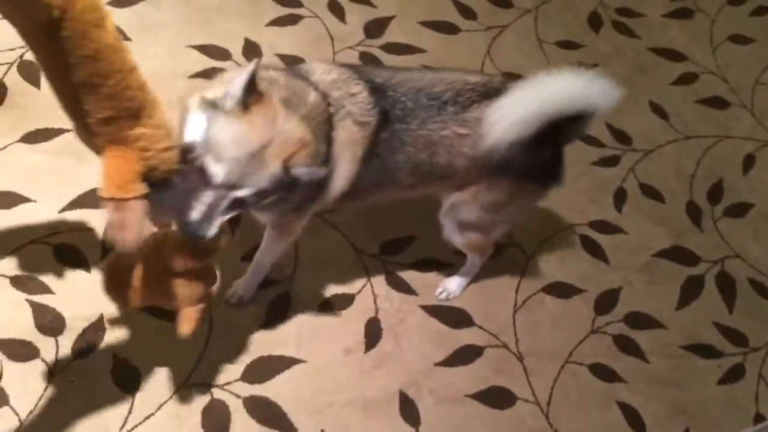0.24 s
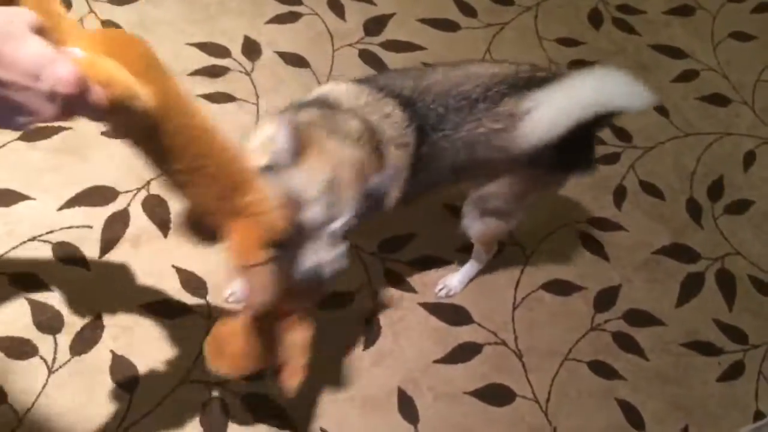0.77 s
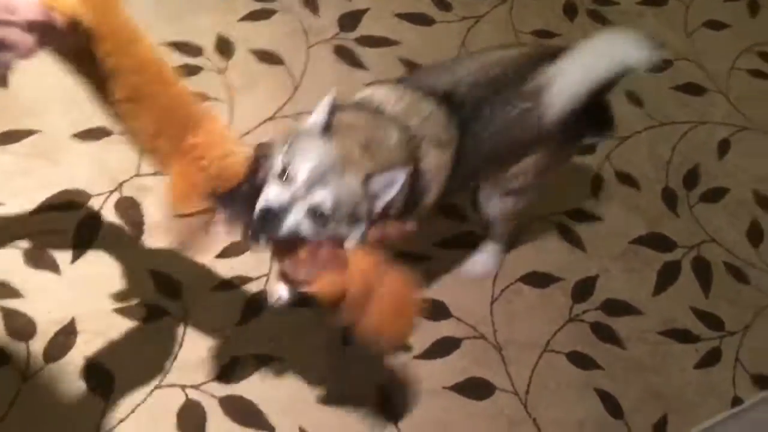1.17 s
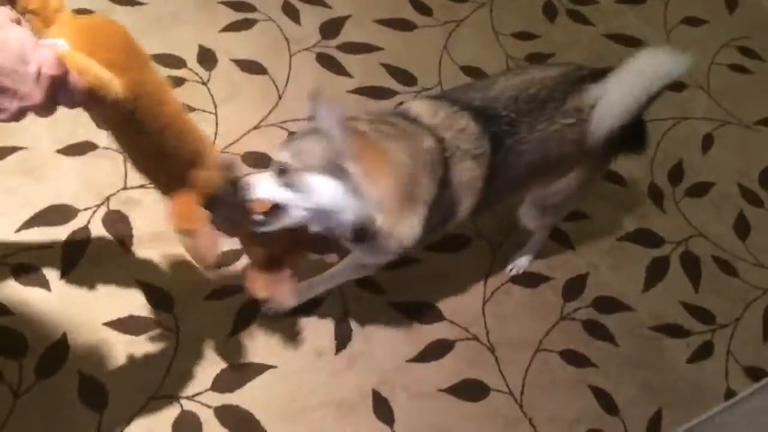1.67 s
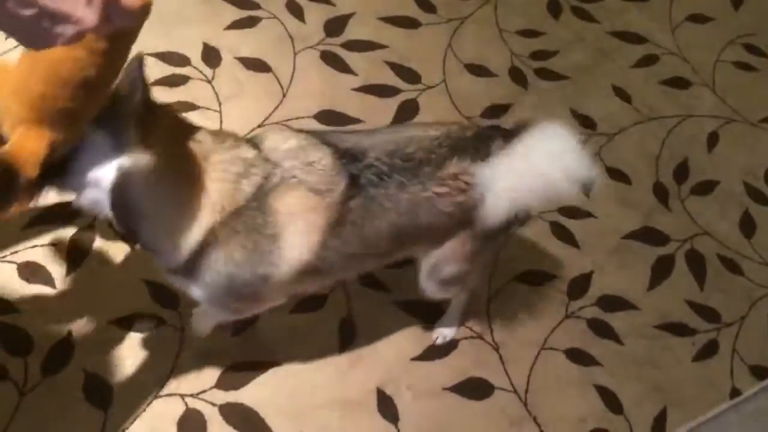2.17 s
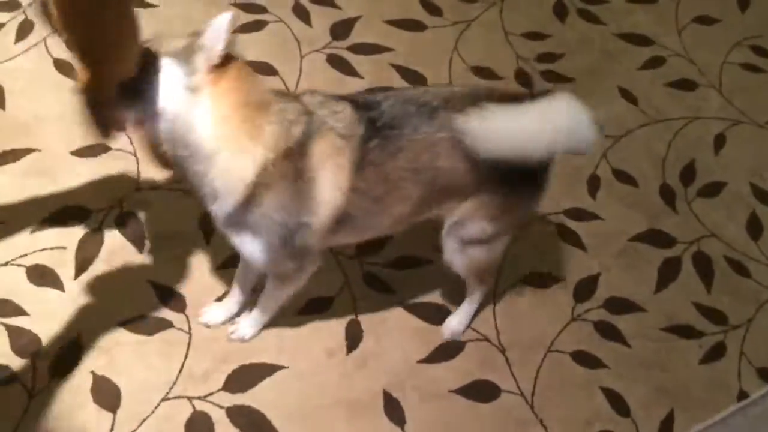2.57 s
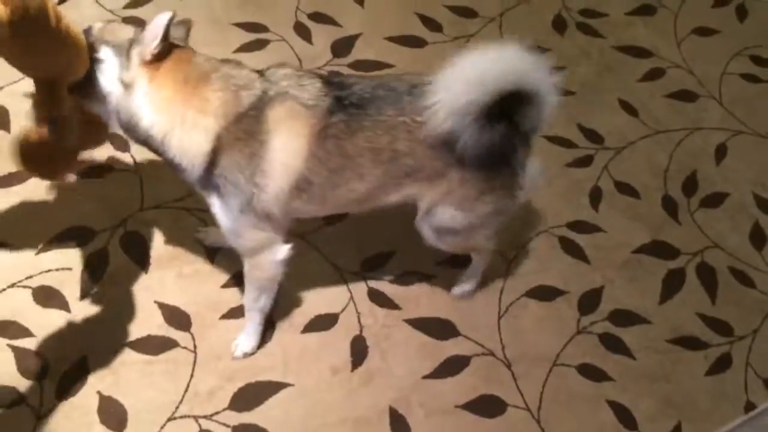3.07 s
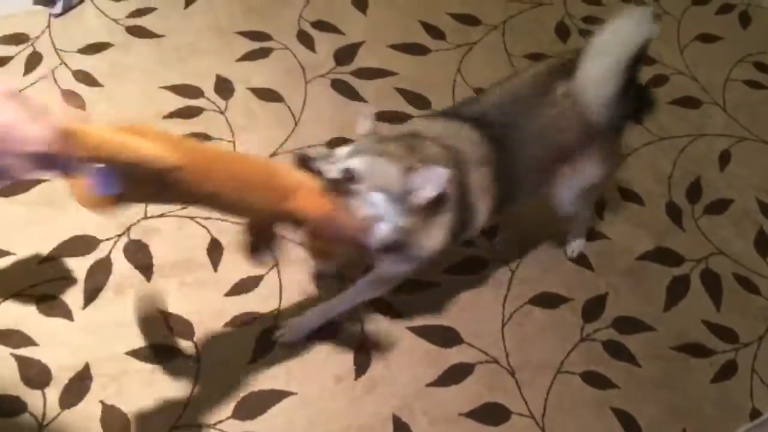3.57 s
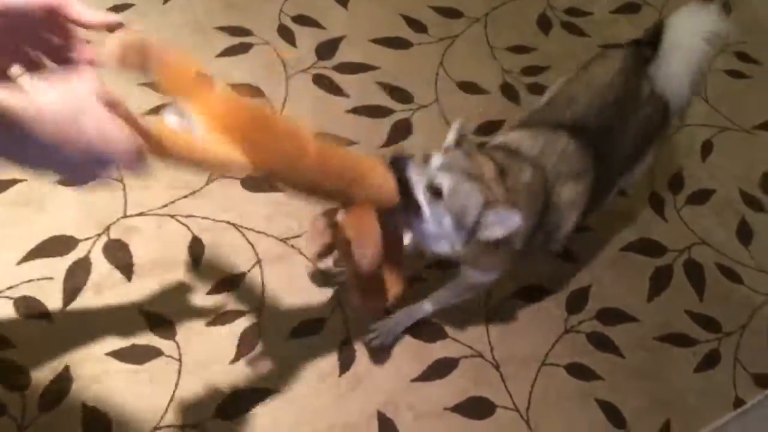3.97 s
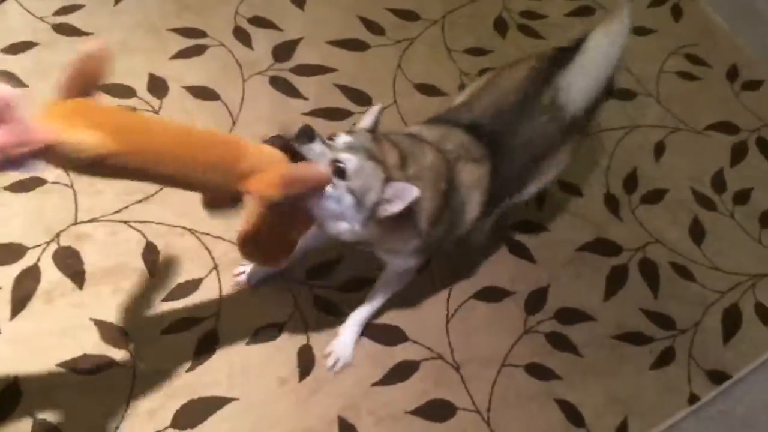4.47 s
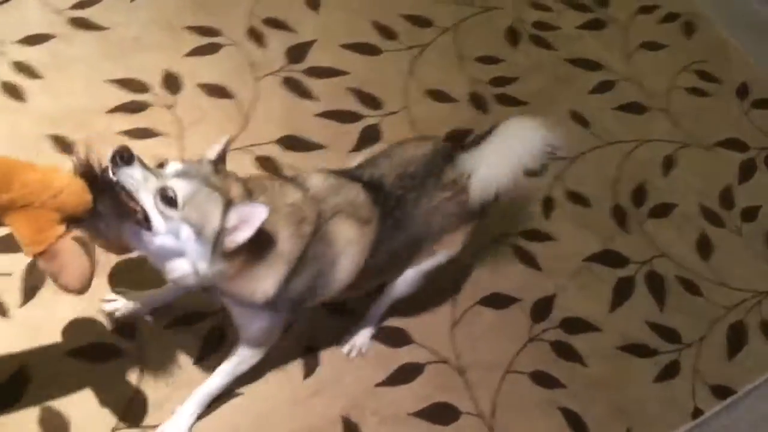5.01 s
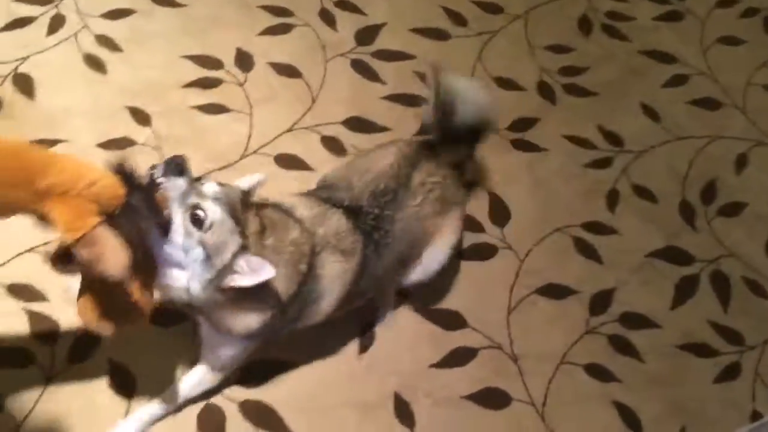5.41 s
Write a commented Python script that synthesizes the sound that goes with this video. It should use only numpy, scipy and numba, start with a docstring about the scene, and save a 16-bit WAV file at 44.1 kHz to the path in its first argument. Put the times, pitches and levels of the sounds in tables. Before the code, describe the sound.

A dog tugs a soft toy indoors, heard close by with short room reflections. Quiet rubbing and clicks come first, then a single abrupt nasal squeak with a thin rasping reply. Paws thump dully on carpet in two clusters, around two and three and a half seconds. Finally the dog growls, throaty and broken, strongest just after five seconds, over soft air and hum.

```python
"""A dog tugs at a plush toy on a carpet in a small room, over a faint mains hum and soft air noise.
At first filtered noise rustles as plush and short ticks click as teeth; then a bite makes the reed honk,
a pulse train through a sinking resonance, and the air flowing back makes it rasp with a thin whistle.
Paws thud as dying noise bursts; at last the dog growls: uneven pulses ring a throat in short grunts
that swell into an open-mouthed snarl, with rough notes and single hard flaps on top."""
import sys
import numpy as np
from scipy import signal
from scipy.fft import rfft, irfft, next_fast_len
from scipy.io import wavfile
from scipy.ndimage import uniform_filter1d
from numba import njit

SR = 44100
rng = np.random.default_rng(int(sys.argv[2]) if len(sys.argv) > 2 else 0)


def dump_mix(stems):
    """Bounce the given channels to the path in sys.argv[1] as a 16-bit WAV at rate SR."""
    frames = np.atleast_2d(stems).T  # one column per channel
    limited = np.clip(frames, -1, 1)  # hard clip at full scale
    pcm = np.round(limited * 32767).astype(np.int16)
    wavfile.write(sys.argv[1], SR, pcm)


N = 249165
TIME = np.arange(N) / SR

# The bite squeezes the air out: its pressure raises the reed's loudness and pitch together.
BITE_START_S, BITE_RISE_S, BITE_FALL_S = 1.1125, 0.020, 0.041
BITE_DB = -23.5
REED_SLACK_HZ, REED_PRESSED_HZ = 352, 484
REED_DELAY_S, REED_ONSET_S = 0.0018, 0.00092  # the reed sticks briefly, then speaks at once
# The chamber's resonance sinks as it is bitten.
CHAMBER_START_HZ, CHAMBER_END_HZ, CHAMBER_SINK_S, CHAMBER_WIDTH_HZ = 4870, 1930, 0.02, 600
# Short pipe that holds the reed and rings on both strokes. Each row: centre in Hz, width in Hz, level in dB.
PIPE_MODES = [(1430, 130, -1), (2255, 62, -2), (3020, 130, -3), (5850, 170, 1)]
# Hard surfaces close to the toy. Each row: delay in seconds, level in dB.
NEAR_ECHOES = [(.0007, -28.5), (.0021, -25), (.0063, -12)]
# Curve of the reed as air flows back. Each row: time in seconds, pitch in Hz, level in dB.
REFILL_CURVE = [(1.242, 730, -33), (1.246, 770, -29.5), (1.250, 900, -26), (1.2535, 1030, -21),
                (1.257, 1180, -26), (1.261, 700, -33), (1.269, 640, -28.5), (1.275, 620, -34),
                (1.283, 590, -43)]
# Returning air whistling in the pipe. One row: start, swell and fade in seconds, level in dB, pitch in Hz.
WHISTLE = (1.21, 0.0072, 0.0449, -41.5, 5750)
# Tone colour of the toy on each stroke. Each row: frequency in Hz, level in dB.
SQUEEZE_COLOUR = [(200, -4), (430, -3), (950, -9), (1450, -7.5), (1900, -8.5), (2700, -8.5), (3600, -6.5),
                  (5000, -13.5), (7000, -20.5), (10000, -37), (15000, -47.5)]
REFILL_COLOUR = [(350, -15.5), (520, -17), (680, -3), (1000, -9), (1450, 0), (2000, -1), (2900, -16),
                 (4500, -29), (5600, -17), (6400, -22), (10000, -28.5), (15000, -48.5)]

# Grunts of the growl. Each row: start, swell and fade in seconds, peak in dB before the dog's mix.
GRUNTS = [(4.021, 0.056, 0.02505, -42), (4.135, 0.004, 0.0427, -54), (4.298, 0.017, 0.0407, -43),
          (4.352, 0.041, .026, -37), (4.535, 0.045, 0.0337, -47), (4.6, 0.041, 0.026, -44),
          (4.644, 0.033, .06, -39.5), (4.748, 0.0084, 0.02224, -44.5), (4.803, 0.012, 0.0606, -45),
          (4.85, 0.035, 0.0612, -42.5), (4.948, 0.011, 0.1254, -33.5), (4.971, .115, 0.1386, -32.5),
          (5.121, 0.097, 0.101, -30.5), (5.26, .018, .055, -30.5), (5.335, 0.064, 0.0259, -45),
          (5.434, 0.04, 0.0853, -46), (5.527, 0.015, 0.1206, -48)]
# Each grunt starts and ends this far under its peak; its edges take this long.
GRUNT_SWELL_DB, GRUNT_EDGE_S = 9, 0.01203
# The folds flap faster with effort: pulses per second at the reference level, and the dB that double it.
FLAP_HZ, FLAP_REFERENCE_DB, FLAP_DOUBLING_DB = 110.93, -34, 55
# Pitch of the voice inside the growl, moving with each pull. Each row: time in seconds, pitch in Hz.
PITCH_CURVE = [(4.0, 274.5), (4.035, 337.2), (4.065, 348.6), (4.1, 420.1), (4.265, 310.6), (4.29, 412.2),
               (4.325, 464.3), (4.35, 343.9), (4.375, 314.3), (4.4, 379.4), (4.44, 428.7), (4.53, 295.7),
               (4.68, 289.4), (4.83, 370), (4.9, 304.2), (4.93, 324), (4.98, 332.8), (5.04, 425.7),
               (5.075, 462.2), (5.1, 437.8), (5.125, 373), (5.162, 430), (5.185, 327.4), (5.24, 329.2),
               (5.277, 436.4), (5.3, 324.7), (5.41, 320.6), (5.46, 398.5), (5.6, 340.6)]
# Fixed throat resonances. Each row: centre in Hz, width in Hz, level in dB.
THROAT_MODES = [(131, 32, -15.5), (216.3, 40, -5.5), (318, 40, -3), (450, 60, -3)]
VOICE_RING_WIDTH_HZ, VOICE_RING_DB = 160, 1  # the throat rings most near the voice's pitch
# Tone colour of the mouth, and of the bared teeth. Each row: frequency in Hz, level in dB.
MOUTH_COLOUR = [(350, -20.5), (570, -12.5), (710, 3.5), (850, 2.5), (1030, 4.5), (1250, -13), (1700, -31)]
SNARL_COLOUR = [(850, -8), (1280, 7.5), (1600, 2.5), (2200, -5.5), (2700, -12.5), (3300, -17.5),
                (4200, -28.5), (6500, -36.5), (10000, -62)]
# Jaw opening, heard as mouth against chest. Each row: time in seconds, level in dB before a fixed trim.
JAW_CURVE = [(4.05, -19), (4.27, -3), (4.3, -10), (4.34, -11.5), (4.4, -10.5), (4.48, 0), (4.57, -9),
             (4.78, -19), (4.82, -13.5), (4.87, -9), (4.935, -8), (4.957, -7), (5.12, -5), (5.17, -5),
             (5.28, -9), (5.4, -10.5), (5.5, 0.5), (5.6, -14.5)]
# Lips drawing off the teeth, as snarl against mouth. Each row: time in seconds, level in dB before a trim.
TEETH_CURVE = [(4.1, -2.5), (4.32, -3.5), (4.4, -0.5), (4.67, -2), (4.97, -4.5), (5.1, 0.5), (5.2, -2.5),
               (5.28, -0.5), (5.36, -6), (5.5, -1)]
# The snarl above 2.3 kHz: lift in dB where the teeth curve is at 0 dB, and dB per dB of baring.
TOP_DB, TOP_FOLLOWS = 6.5, 0.97
RASP_FLUTTER = 0.42  # share of the rasp that pulses with the throat
FLUTTER_HZ = 62.34  # the loose throat chops the voice about this often
# Moments when the voice rises out of the rattle.
# Each row: start, swell and fade in seconds, peak in dB before flutter and mix, flutter depth (held to 0.4-1).
NOTES = [(3.994, 0.048, 0.082, -43.5, .45), (4.05, 0.014, 0.018, -36, .7),
         (4.266, 0.012, 0.029, -41.5, 0.49), (4.3, 0.025, 0.048, -39.5, 0.57),
         (4.355, 0.041, 0.023, -35.5, .8), (4.413, 0.022, 0.01, -47.5, 0.39), (4.625, 0.04, 0.041, -39, .7),
         (4.896, 0.035, 0.025, -33.5, 0.77), (4.945, 0.025, 0.03, -35.5, 0.8),
         (5.035, 0.039, 0.096, -35, 0.74), (5.121, 0.0095, 0.025, -39, 0.38),
         (5.148, 0.013, 0.022, -28.5, 0.75), (5.17, 0.045, 0.038, -31, 0.69),
         (5.254, 0.02, 0.046, -35.5, 0.9), (5.34, 0.05, 0.037, -48, 0.57)]
# Second and third harmonic of the voice. Each entry: level in dB against the fundamental.
OVERTONES_DB = [-18, -31.5]
# Single flaps of the throat. Each row: start in seconds, peak in dB, brightness (lowpass) in Hz.
POPS = [(4.134, -33, 1186), (4.298, -38, 1400), (4.569, -38.5, 2000), (4.58, -36, 1300), (4.603, -39, 2600),
        (4.669, -32.5, 1698), (4.713, -37, 1000), (4.8137, -37, 1090), (4.822, -40, 1300),
        (4.953, -27.5, 1200), (5.024, -33, 2401), (5.05, -23, 1100), (5.07, -23, 1701)]
# What a single flap rings. Each row: centre in Hz before a random detune, width in Hz, level in dB.
POP_MODES = [(332, 97, 3), (464, 190, -2), (769, 94, -4), (1080, 199, -13.5), (1478, 280, -10.5),
             (2200, 400, -26)]

# Paws on the carpet. Each row: start in seconds, peak in dB, hardness (top of the band) in Hz, ring in seconds.
PAWS = [(1.481, -48.5, 960, 0.11), (1.967, -32, 390, 0.065), (1.982, -36, 335, 0.03),
        (2.105, -46, 1200, 0.17), (2.63, -48, 237, 0.026), (3.443, -41, 1190, 0.08),
        (3.457, -40, 597, 0.072), (3.532, -46.5, 447, 0.39), (3.581, -51, 805, 0.25),
        (3.657, -38.5, 427, 0.061), (3.776, -49.5, 700, 0.14), (4.135, -58, 710, 0.063),
        (4.525, -39.5, 201, 0.096)]
# Floor under a paw. Each row: frequency in Hz, level in dB.
FLOOR_COLOUR = [(40, -23), (90, -3.5), (140, -4), (220, 0), (340, 2), (460, -0.5), (650, -7), (1000, -7.5),
                (3000, -9)]
# Floor boom of heavy landings. Each row: start in seconds, pitch in Hz, level in dB before swell, ring in seconds.
BOOMS = [(1.968, 120.8, -40, 0.1), (4.336, 130.4, -41, 0.12), (4.522, 132, -31, 0.11)]
# Teeth and claws. Each row: start in seconds, peak in dB, centre in Hz, width in Hz.
CLICKS = [(.109, -55.5, 11000, 2800), (.482, -50.5, 7240, 2500), (.837, -59, 7000, 2000),
          (.887, -49, 1040, 1198), (1.044, -52.5, 7600, 1990), (1.484, -54, 6850, 1500),
          (1.784, -53.5, 5420, 3500), (2.022, -51, 1690, 700), (2.0352, -41.5, 1520, 1000),
          (2.052, -59, 1510, 400), (2.3193, -47.5, 6160, 3000), (2.792, -51, 2700, 1800),
          (2.793, -44.5, 7100, 4000), (3.962, -45, 1400, 2940), (4.229, -39.5, 7240, 1000),
          (4.242, -43.5, 1794, 4000), (4.539, -41.5, 1415, 500), (5.16, -42, 2347, 1500),
          (5.226, -39, 1974, 1500), (5.276, -38, 1900, 1500), (5.486, -34.5, 2230, 1500),
          (5.5463, -48, 2750, 1500)]
CLICK_BODY_DB = -5.5  # the duller body under each tick
CLICK_RING_S, CLICK_SHORTENING = 0.024, 0.23  # ring at 1 kHz; power by which brighter ticks are shorter

# Tugs that rub the plush. Each row: strongest moment, swell and fade in seconds, peak in dB before a 3 dB lift.
TUGS = [(.07, .1, 0.049, -69.5), (.38, 0.27, 0.34, -71), (.53, 0.06, 0.12, -67), (.74, 0.21, 0.081, -77.5),
        (1.03, 0.25, 0.12, -71), (1.452, 0.44, 0.19, -73), (1.98, 0.014, 0.13, -73.5),
        (2.12, 0.028, 0.038, -69), (2.51, 0.039, 0.042, -75.5), (2.75, 0.083, 0.026, -75),
        (2.81, 0.022, 0.11, -74), (3.47, 0.078, 0.22, -66), (3.56, 0.082, 0.17, -70.5),
        (3.79, 0.11, 0.09, -67), (3.97, 0.089, 0.034, -67.5), (4.08, 0.14, 0.12, -67.5),
        (4.26, 0.089, 0.13, -66), (4.38, 0.06, 0.085, -63.5), (4.65, 0.43, 0.18, -67.5),
        (4.96, 0.18, 0.18, -62.5), (5.2, 0.36, 0.085, -67.5), (5.49, 0.29, 0.12, -67.5),
        (5.629, 0.048, 0.025, -65)]
PLUSH_REST_DB = -82.5  # before the same lift: the toy never lies quite still in the teeth
PLUSH_CLUMP_DB = 1.46  # the pile catches and lets go in tufts
# Tone colour of the fibres. Each row: frequency in Hz, level in dB.
PLUSH_COLOUR = [(600, 1.5), (1500, 4), (4000, 0.5), (7000, -0.5), (10000, -3.5), (15000, -7.5)]
# Scuffs on the carpet. Each row: middle and length in seconds, level in dB, centre in Hz, width in Hz.
SCUFFS = [(0.513, 0.091, -79, 1100, 1200), (0.907, 0.057, -64, 850, 1000), (0.94, 0.069, -70, 1500, 900),
          (1.463, 0.14, -68, 2930, 2000), (2.058, 0.068, -62.5, 1050, 1200), (2.117, 0.059, -67, 900, 1200),
          (2.752, 0.04, -70.5, 3160, 1500), (3.458, 0.066, -60.5, 2700, 450),
          (3.462, 0.084, -68, 4350, 800), (3.39, 0.09, -73.5, 2600, 1200)]
SCUFF_GRAIN_DB = 5

# Still air of the room. Each row: frequency in Hz, relative level in dB.
AIR_COLOUR = [(25, -19.5), (52, 2.5), (85, -4.5), (155, -2), (205, 2.5), (300, -4), (450, 2.5), (620, -6),
              (1000, -7.5), (2000, -16), (3200, -22.5), (6300, -27.5), (15000, -30.5)]
AIR_DB, HUM_HZ, HUM_DB = -65.5, 120.6, -65.5
# Room decay. Each row: frequency in Hz, time to fall 60 dB in seconds.
ROOM_T60 = [(150, 0.35), (500, 0.52), (2000, 0.42), (5500, 0.2), (14000, 0.16)]
ROOM_GRAIN_DB = 2  # spread in strength of single reflections
EARLY_DB, EARLY_S = 4, 0.049  # first reflections, off floor and furniture, are stronger and soon gone
CUTOFF_HZ = 15350


def squeaker():
    """The reed buzzes through a chamber that sinks under the bite, then rasps as the bladder refills."""
    return squeeze() + whistle() + refill()


def squeeze():
    """Pressure drives reed pulses through chamber, pipe and near echoes, loudest at the highest pitch."""
    pressure = arch(BITE_START_S, BITE_RISE_S, BITE_FALL_S)
    since_bite = TIME - BITE_START_S
    reed_hz = REED_SLACK_HZ + (REED_PRESSED_HZ - REED_SLACK_HZ) * pressure ** 2
    reed = valve(reed_hz, jitter=0.016, shimmer_db=1.5, hiss=0.17)
    sink = np.exp(-np.maximum(since_bite, 0) / CHAMBER_SINK_S)
    chamber_hz = CHAMBER_END_HZ + (CHAMBER_START_HZ - CHAMBER_END_HZ) * sink
    chamber = gliding_resonance(reed, chamber_hz, CHAMBER_WIDTH_HZ)
    chamber = gliding_resonance(chamber, chamber_hz, CHAMBER_WIDTH_HZ)
    honk = colour(pipe(reed - from_db(17) * chamber), SQUEEZE_COLOUR)
    echoes = sum(from_db(db) * np.interp(TIME - delay, TIME, honk) for delay, db in NEAR_ECHOES)
    honk = even(honk + echoes, span=0.004)
    onset = np.clip((since_bite - REED_DELAY_S) / REED_ONSET_S, 0, 1)
    return honk * from_db(BITE_DB) * pressure ** 0.97 * onset


def whistle():
    """Returning air turns noise into a thin whistle through two narrow resonances."""
    start, swell, fade, level_db, hz = WHISTLE
    breath = resonate(resonate(rng.standard_normal(N), hz, 300), hz, 300)
    return from_db(level_db) * arch(start, swell, fade) * even(breath, span=0.0046)


def refill():
    """Air flowing back drives the reed roughly and breathily through its pipe."""
    hz, level_db = in_time(REFILL_CURVE)
    reed = valve(hz, jitter=0.07, shimmer_db=2, hiss=0.55)
    rasp = even(colour(pipe(reed), REFILL_COLOUR), span=0.00755)
    return rasp * from_db(level_db) * gate(REFILL_CURVE, fade=0.00084)


def pipe(x):
    """The reed's pipe adds its own ring to whatever passes through."""
    return x + sum(from_db(db) * resonate(x, hz, width) for hz, width, db in PIPE_MODES)


def growl(slaps):
    """Uneven flaps ring a throat that follows the pitch; the upper bands open with jaw and lips."""
    push = effort()
    pitch_hz, = in_time(PITCH_CURVE)
    jaw_db, = in_time(JAW_CURVE)
    teeth_db, = in_time(TEETH_CURVE)

    effort_db = 20 * np.log10(np.maximum(push, 1e-3))
    flap_hz = FLAP_HZ * 2 ** ((effort_db - FLAP_REFERENCE_DB) / FLAP_DOUBLING_DB)
    folds = valve(flap_hz, jitter=0.25, shimmer_db=3, hiss=0.45)
    throat = sum(from_db(db) * resonate(folds, hz, width) for hz, width, db in THROAT_MODES)
    throat = throat + from_db(VOICE_RING_DB) * gliding_resonance(folds, pitch_hz, VOICE_RING_WIDTH_HZ)
    throat = butter(throat, 3, [105, 540], "band")
    # the rattle recedes under a note
    locked = np.max([arch(start, swell, fade) for start, swell, fade, _, _ in NOTES], axis=0)
    chest = from_db(-0.5 - 6.1 * locked) * even(throat, span=0.018)

    # the tense edges of the folds chatter at the voice's pitch, in fine, rough pulses
    rasp = 0.5 * folds + valve(pitch_hz, jitter=0.075, shimmer_db=4, hiss=0.4)
    mouth = from_db(jaw_db - 0.9) * even(colour(rasp, MOUTH_COLOUR), span=0.016)
    bright = colour(rasp, SNARL_COLOUR)
    top = signal.sosfiltfilt(signal.butter(2, 2300, "high", fs=SR, output="sos"), bright)
    bared = bright + (from_db(TOP_DB + TOP_FOLLOWS * teeth_db) - 1) * top
    snarl = from_db(jaw_db + teeth_db - 2.43) * even(bared, span=0.031)
    return (chest + (mouth + snarl) * (1 + RASP_FLUTTER * slaps)) * push


def effort():
    """Push of air behind the growl: every grunt starts abruptly, swells, sinks and stops."""
    push = np.zeros(N)
    for start, swell, fade, peak_db in GRUNTS:
        edge_db = peak_db - GRUNT_SWELL_DB
        shape = [(start, edge_db), (start + swell, peak_db), (start + swell + fade, edge_db)]
        level_db, = in_time(shape)
        push = np.maximum(push, from_db(level_db) * gate(shape, fade=GRUNT_EDGE_S))
    return push


def flutter():
    """The loose throat slaps open at uneven intervals: sharp start, dying away, mean zero."""
    phase = np.cumsum(FLUTTER_HZ * np.exp(0.36 * drift(70))) / SR
    slap_gains = from_db(2.3 * rng.standard_normal(int(phase[-1]) + 1))
    strength = slap_gains[phase.astype(int)]
    slaps = uniform_filter1d(strength * np.exp(-2.4 * (phase % 1)), size=110)
    return slaps / slaps.mean() - 1


def voice(slaps):
    """For moments the folds catch a rough, gliding note, chopped by the flutter of the throat."""
    pitch_hz, = in_time(PITCH_CURVE)
    phase = 2 * np.pi * np.cumsum(pitch_hz * (1 + 0.045 * drift(260))) / SR
    tone = np.sin(phase)
    for harmonic, db in enumerate(OVERTONES_DB, start=2):
        tone = tone + from_db(db) * np.sin(harmonic * phase)
    levels = []
    for start, swell, fade, peak_db, depth in NOTES:
        chopped = 1 + np.clip(depth, 0.4, 1) * slaps
        levels.append(from_db(peak_db) * arch(start, swell, fade) * chopped)
    return tone * np.max(levels, axis=0)


def pops():
    """Now and then the folds let go in single hard flaps, each ringing the throat and mouth."""
    out = np.zeros(N)
    for s, peak_db, bright_hz in POPS:
        flap = 0.1 * burst(0.012)
        flap[0] += 1
        ring = 0
        for k, (hz, width_hz, mode_db) in enumerate(POP_MODES):
            mode = resonate(flap, hz * rng.uniform(0.86, 1.04), width_hz)
            ring = ring + from_db(mode_db) * mode * (-1) ** k  # neighbours in opposite polarity
        add(out, s, from_db(peak_db) * peak_one(butter(ring, 3, bright_hz, "low")))
    return out


def paws():
    """Soft pads thud on the carpet as filtered bursts; heavy landings make the floor boom as dying sines."""
    out = np.zeros(N)
    for s, peak_db, hard_hz, t60 in PAWS:
        thud = butter(colour(burst(t60), FLOOR_COLOUR), 2, [70, hard_hz], "band")
        add(out, s, from_db(peak_db) * peak_one(thud))
    t = TIME[:SR // 2]
    for s, hz, level_db, t60 in BOOMS:
        swell = 1 - np.exp(-t * hz)  # the floor takes about a cycle to get going
        add(out, s, swell * np.sin(2 * np.pi * hz * t) * from_db(level_db - 60 * t / t60))
    return out


def clicks():
    """Teeth and claws give short, broad ticks; the brighter, the shorter."""
    out = np.zeros(N)
    for s, peak_db, hz, width_hz in CLICKS:
        t60 = CLICK_RING_S * (1000 / hz) ** CLICK_SHORTENING
        tick = resonate(resonate(burst(t60), hz, 0.8 * hz), hz, width_hz)
        body = resonate(burst(t60), 0.6 * hz, 0.9 * hz)
        tick = tick + from_db(CLICK_BODY_DB) * body
        tick = butter(tick, 2, min(1.8 * hz, 0.4 * SR), "low")
        add(out, s, from_db(peak_db) * peak_one(tick))
    return out


def rubbing():
    """Plush fibres slip in a grainy hiss at every tug; feet scuff over the pile, catching and slipping."""
    power = from_db(PLUSH_REST_DB) ** 2
    for s, swell, fade, peak_db in TUGS:
        power = power + (from_db(peak_db) * arch(s - swell, swell, fade)) ** 2
    fibres = rng.standard_normal(N) * from_db(1.4 * drift(400) + PLUSH_CLUMP_DB * drift(70))
    out = from_db(3.0) * np.sqrt(power) * rms_one(colour(fibres, PLUSH_COLOUR))
    slips = rng.standard_normal(N) * from_db(SCUFF_GRAIN_DB * drift(260))
    for s, length, level_db, hz, width_hz in SCUFFS:
        stroke = np.exp(-2 * ((TIME - s) / (length / 2)) ** 2)
        scuff = resonate(resonate(slips, hz, width_hz), hz, width_hz)
        out += from_db(level_db) * stroke * rms_one(scuff)
    return out


def background():
    """Mains hum as one wavering sine over the soft rush of the room as coloured noise."""
    hum = np.sqrt(2) * np.sin(2 * np.pi * HUM_HZ * TIME) * from_db(HUM_DB + 0.5 * drift(3.4))
    settling = from_db(np.interp(TIME, [0, 0.3], [-9, 0]))  # the hum swells at first
    air = from_db(AIR_DB) * rms_one(colour(rng.standard_normal(N), AIR_COLOUR))
    return hum * settling + air


def room(x, gap):
    """Diffuse reflections arrive after a short gap and die away, each band at its own rate."""
    t = TIME[:SR * 2 // 3]
    edges = np.geomspace(70, 17000, 9)
    tail = 0
    for low, high in zip(edges, edges[1:]):
        echoes = rng.standard_normal(len(t)) * from_db(ROOM_GRAIN_DB * drift(500)[:len(t)])
        band = butter(rms_one(echoes), 2, [low, high], "band")
        tail = tail + band * from_db(-60 * t / at_hz(ROOM_T60, np.sqrt(low * high)))
    tail = tail * np.clip(t / gap - 1, 0, 1) * (1 + from_db(EARLY_DB) * np.exp(-t / EARLY_S))
    return signal.fftconvolve(x, tail / np.sqrt(np.sum(tail ** 2)))[:N]


def valve(hz, jitter, shimmer_db, hiss):
    """A flapping valve: a sharp pulse at each closure and a puff of turbulence after it."""
    step = hz * np.exp(jitter * drift(np.mean(hz))) / SR
    phase = np.cumsum(step) % 1
    pulses = np.maximum(1 - np.abs(phase / step - 1), 0) / np.sqrt(step)
    pulses = pulses - np.sqrt(step)  # take out the steady part
    puffs = rms_one(np.exp(-3 * phase) * rng.standard_normal(N))
    return (pulses + hiss * puffs) * from_db(shimmer_db * drift(np.mean(hz)))


def burst(t60):
    """A quarter second of noise that dies away."""
    t = TIME[:SR // 4]
    return rng.standard_normal(len(t)) * from_db(-60 * t / t60)


def resonate(x, hz, width_hz):
    """A resonance with gain about one at its top."""
    r = np.exp(-np.pi * width_hz / SR)
    forward = np.array([1, 0, -1]) * (1 - r * r) / 2
    feedback = [1, -2 * r * np.cos(2 * np.pi * hz / SR), r * r]
    return signal.lfilter(forward, feedback, x + 1e-18)


def gliding_resonance(x, hz, width_hz):
    """A resonance whose centre follows a curve in Hz."""
    return glide(x, 2 * np.pi * hz / SR, np.exp(-np.pi * width_hz / SR))


@njit
def glide(x, angle, r):
    """Two-pole ring, sample by sample, with a moving pole angle and fixed pole radius."""
    y = np.zeros(len(x))
    for i in range(2, len(x)):
        drive = (1 - r * r) / 2 * (x[i] - x[i - 2])
        y[i] = drive + 2 * r * np.cos(angle[i]) * y[i - 1] - r * r * y[i - 2]
    return y


def colour(x, points):
    """Causal (minimum-phase) filter with the given spectrum, falling away past its ends."""
    size = 2 * next_fast_len(len(x) // 2 + 4096)
    hz = np.maximum(np.arange(size // 2 + 1) * SR / size, 5)
    octaves_below = np.maximum(np.log2(points[0][0] / hz), 0)
    octaves_above = np.maximum(np.log2(hz / points[-1][0]), 0)
    level_db = at_hz(points, hz) - 12 * (octaves_below + octaves_above)
    # fold the cepstrum forward in time to get minimum phase
    cepstrum = irfft(np.log(from_db(level_db)))
    cepstrum[1:size // 2] *= 2
    cepstrum[size // 2 + 1:] = 0
    return irfft(rfft(x, size) * np.exp(rfft(cepstrum)), size)[:len(x)]


def butter(x, order, hz, kind):
    """Butterworth filter."""
    return signal.sosfilt(signal.butter(order, hz, kind, fs=SR, output="sos"), x)


def at_hz(points, hz):
    """Read a spectrum on a log-frequency axis."""
    f, value = np.transpose(points)
    return np.interp(np.log(np.maximum(hz, 1)), np.log(f), value)


def in_time(rows):
    """Each column of a curve at every sample."""
    s, *columns = np.transpose(rows)
    return [np.interp(TIME, s, c) for c in columns]


def gate(rows, fade):
    """One while a curve lasts, fading to nothing outside it."""
    return np.clip(1 + np.minimum(TIME - rows[0][0], rows[-1][0] - TIME) / fade, 0, 1)


def arch(start, swell, fade):
    """A smooth push from nothing up to one and back."""
    return np.sin(np.pi / 2 * np.interp(TIME, [start, start + swell, start + swell + fade], [0, 1, 0]))


def drift(rate):
    """Smooth chance with spread near one, a new random knot `rate` times a second."""
    knots = rng.standard_normal(N // 16)
    return np.interp(TIME * rate, np.arange(len(knots)), knots)


def even(x, span):
    """Hold the short-term power near one."""
    size = max(int(span * SR), 2)
    power = uniform_filter1d(uniform_filter1d(x * x, size), size)
    return x / np.sqrt(np.abs(power) + 1e-12)


def rms_one(x):
    """Scale to unit power."""
    return x / np.sqrt(np.mean(x ** 2) + 1e-20)


def peak_one(x):
    """Scale to a peak of one."""
    return x / np.abs(x).max()


def from_db(db):
    """Decibels to gain."""
    return 10 ** (np.asarray(db) / 20)


def add(out, s, sound):
    """Mix a sound in at a given time."""
    at = int(s * SR)
    out[at:at + len(sound)] += sound[:N - at]


def scene():
    """Toy, dog and contacts with their reflections, over rubbing plush and the background."""
    toy = squeaker()
    slaps = flutter()
    dog = from_db(1.5) * growl(slaps) + from_db(1.0) * voice(slaps) + pops()
    dog = butter(dog, 2, 135, "high")
    contacts = paws() + clicks()
    sends = from_db(-10.0) * toy + from_db(-8.5) * dog + from_db(-8.0) * contacts
    reflections = room(sends, gap=0.00351)
    return (toy + dog + contacts + reflections + rubbing() + background())[None]


def record(dry):
    """The top is cut steeply."""
    return signal.sosfilt(signal.ellip(12, 0.1, 80, CUTOFF_HZ, fs=SR, output="sos"), dry)


dry = scene()
out = record(dry)
dump_mix(out)
```